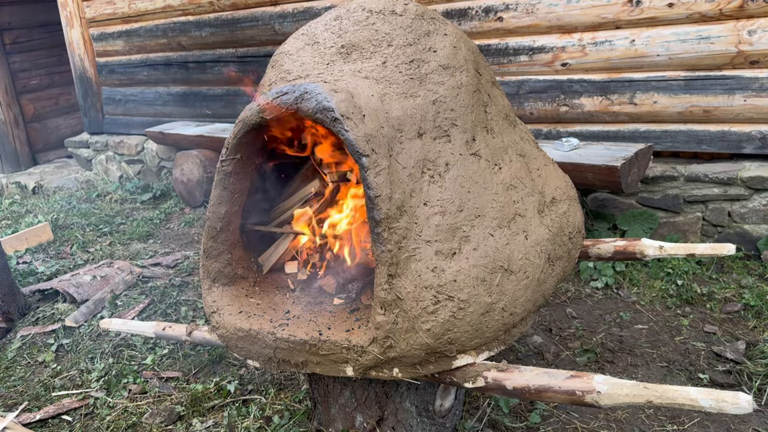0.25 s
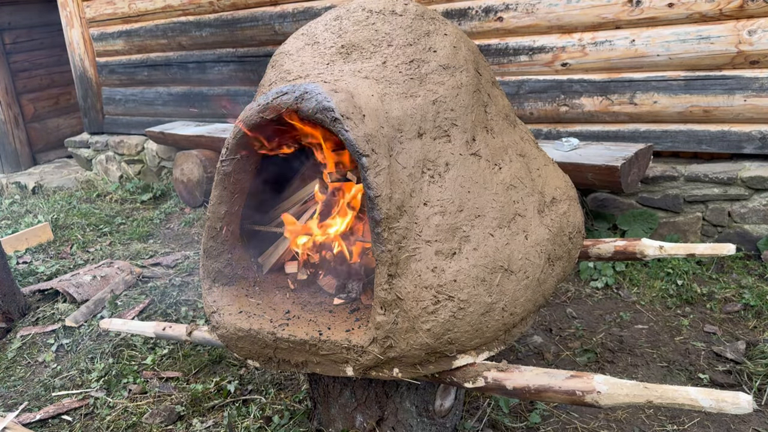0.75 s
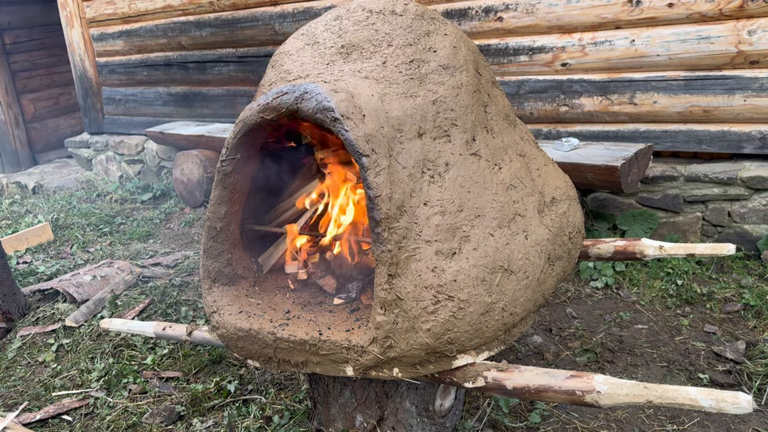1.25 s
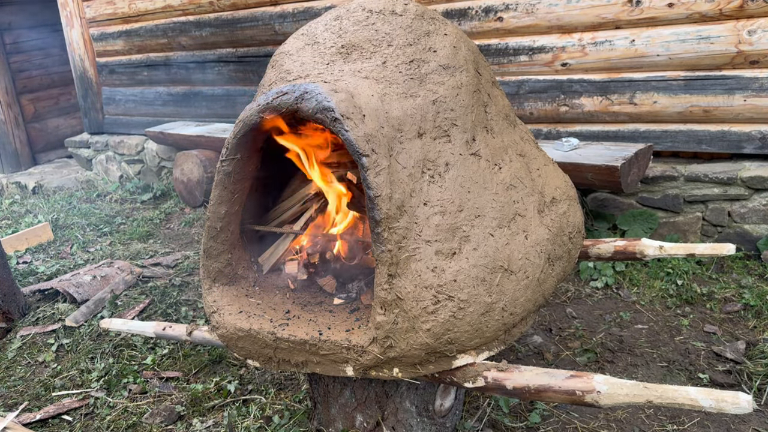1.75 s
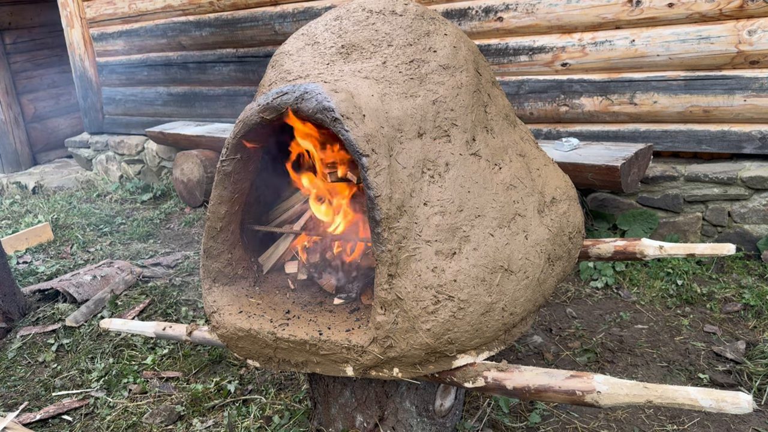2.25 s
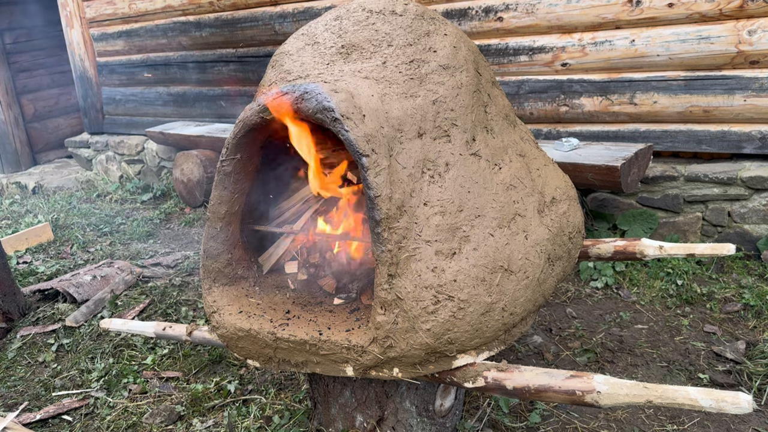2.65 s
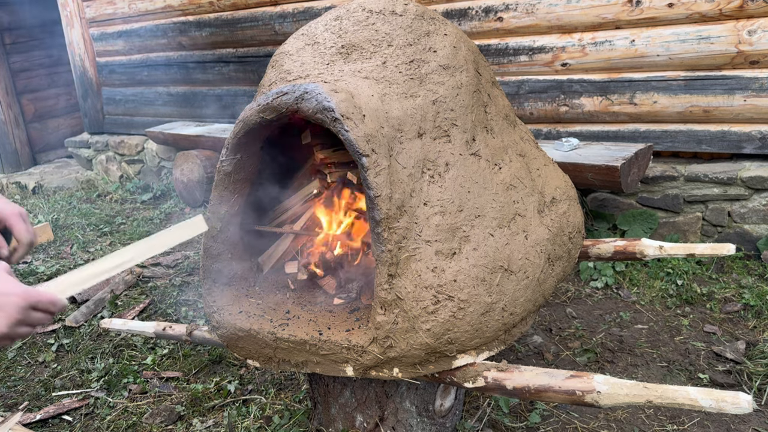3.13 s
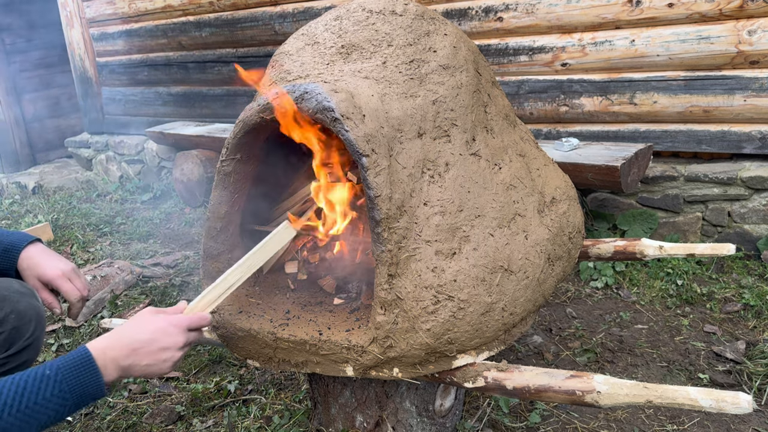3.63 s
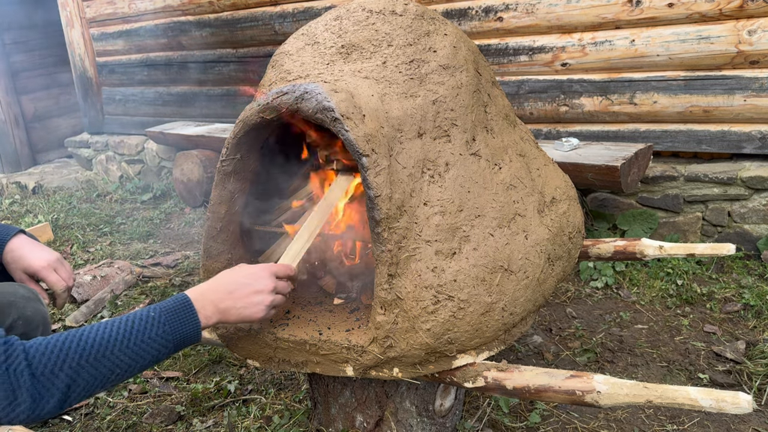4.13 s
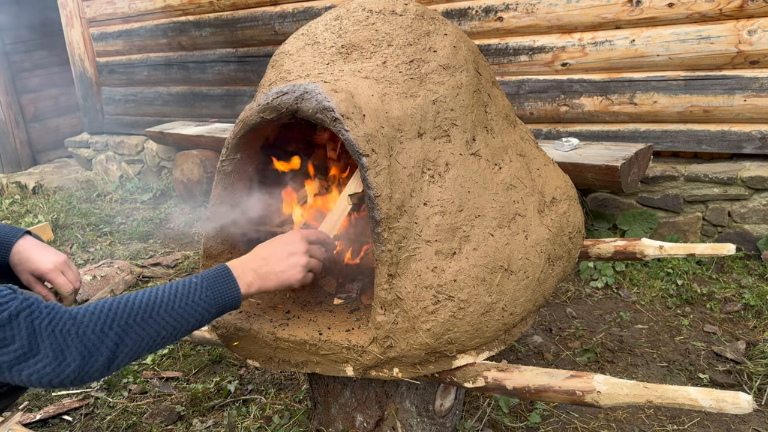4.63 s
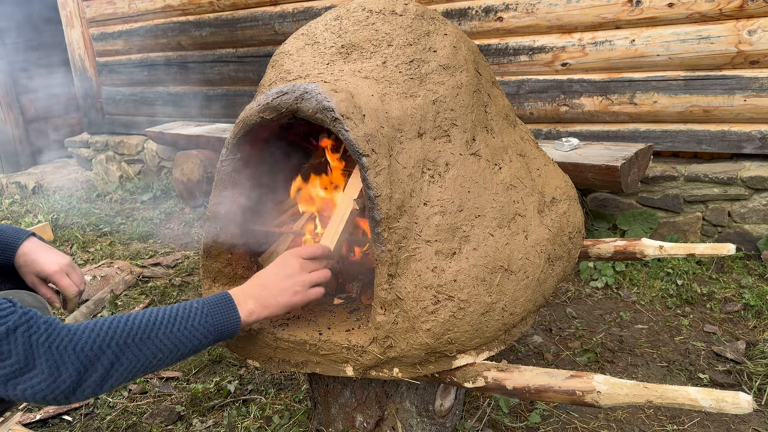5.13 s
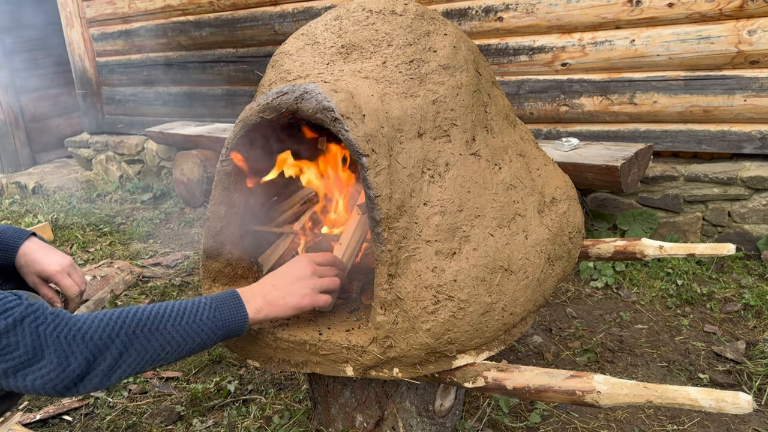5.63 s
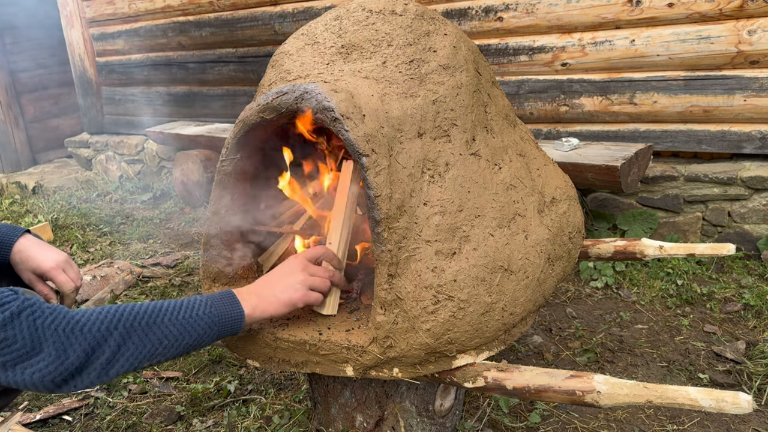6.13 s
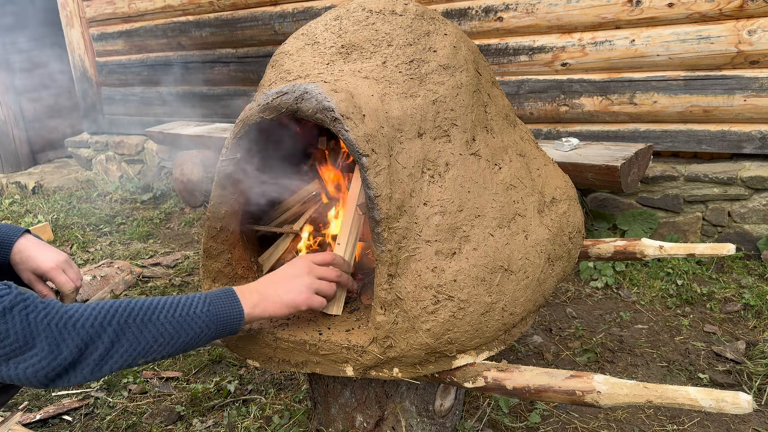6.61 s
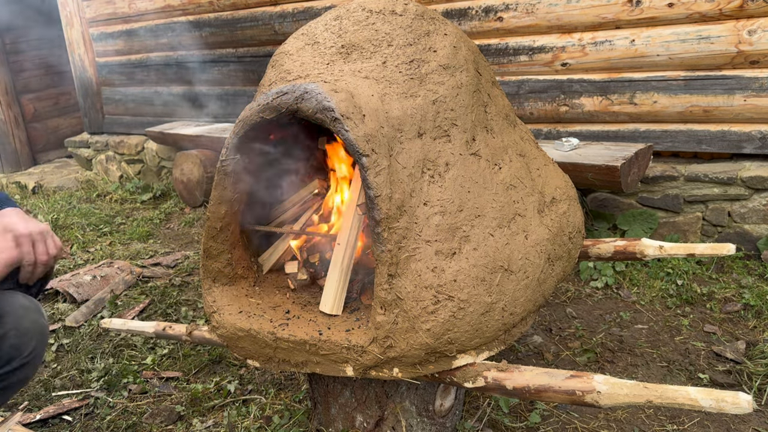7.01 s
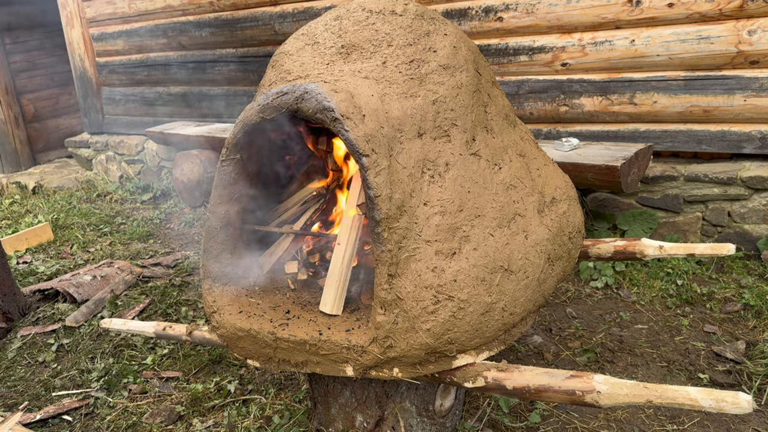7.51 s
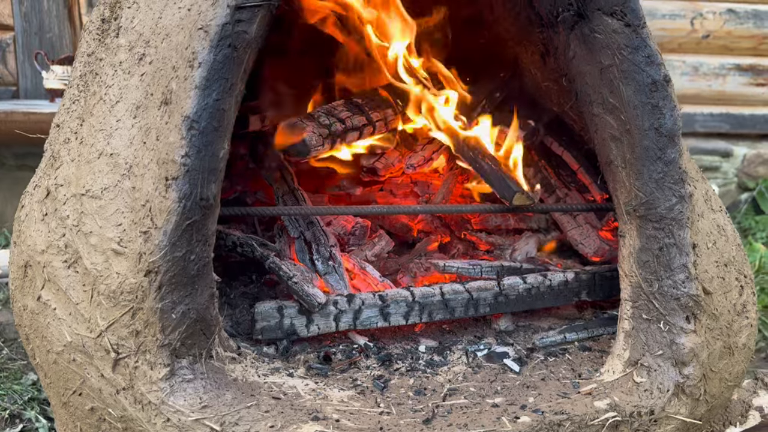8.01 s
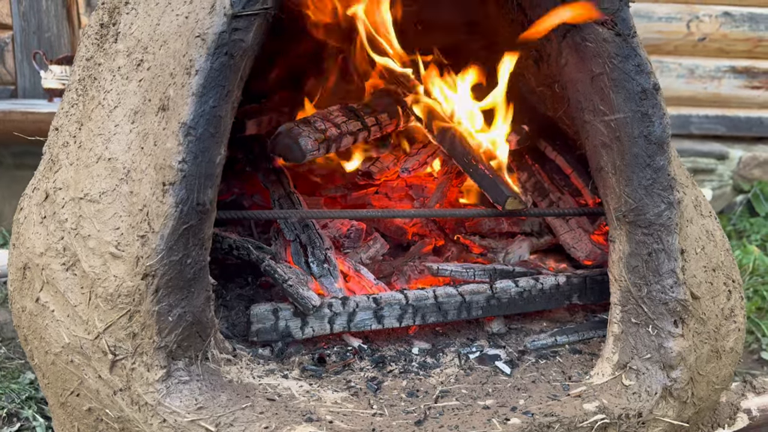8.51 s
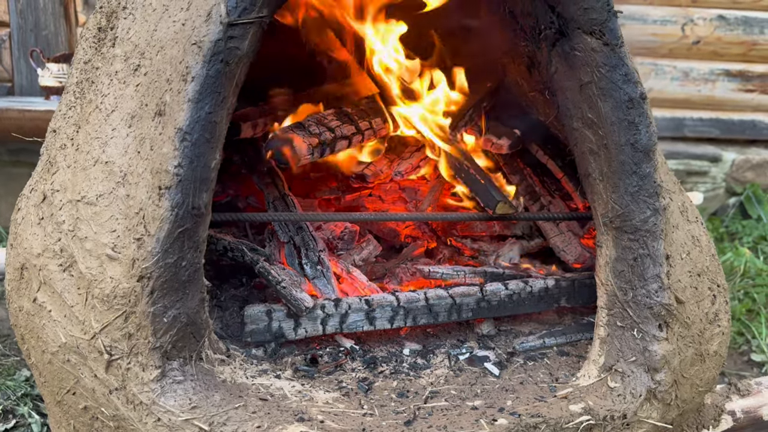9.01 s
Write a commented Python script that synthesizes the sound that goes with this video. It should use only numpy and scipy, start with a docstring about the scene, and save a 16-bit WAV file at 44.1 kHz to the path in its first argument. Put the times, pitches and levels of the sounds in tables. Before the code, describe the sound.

Sharp dry snaps and hollow booming pops of burning kindling over faint sizzle and low flame rumble, wood knocking as a stick is placed.

```python
"""A wood fire in an outdoor clay oven crackles, snaps and pops while a stick of kindling is fed in.
Cracks are bursts of noise shaped like breaking fibres; big pops and one heavy knock also boom.
Filtered noise gives the rumble of the flames, the rush of the draught and the sizzle of sap.
Wood knocks and scrapes in short dull bursts, and a sleeve rustles as swelling noise.
A low thud and a far bird are plain swelling tones."""
import sys
import numpy as np
from scipy import signal
from scipy.fft import rfft, irfft
from scipy.io import wavfile
from scipy.ndimage import uniform_filter1d

SR = 44100
rng = np.random.default_rng(int(sys.argv[2]) if len(sys.argv) > 2 else 0)


def transcribe(signal):
    """Save signal, clipped to [-1, 1], as a 16-bit WAV file at the path in sys.argv[1]."""
    frames = np.atleast_2d(signal).T
    limited = np.clip(frames, -1, 1)
    pcm = np.round(limited * 32767).astype(np.int16)
    wavfile.write(sys.argv[1], SR, pcm)


N = 408366
TIME, FREQS = np.arange(N) / SR, np.fft.rfftfreq(N, 1 / SR)
# the time and frequency scales of one short sound
SHORT_TIME, SHORT_HZ = np.arange(8192) / SR, np.fft.rfftfreq(8192, 1 / SR)


def amp(db):
    """Turns decibels into a gain."""
    return 10 ** (np.asarray(db) / 20)


def unit(x):
    """Scales a signal to rms 1."""
    return x / np.sqrt(np.mean(x ** 2) + 1e-20)


def read(points, hz):
    """Joins points by straight lines over log frequency."""
    f, value = np.transpose(points)
    return np.interp(np.log(hz + 1), np.log(f + 1), value)


def add(mix, s, sound):
    """Mixes a sound in at time s."""
    part = mix[:, max(round(s * SR), 0):][:, :sound.shape[-1]]
    part += sound[..., :part.shape[-1]]


def drift(hz):
    """Random wandering of rms 1, mostly slower than hz."""
    spectrum = rfft(rng.standard_normal(N)) * np.exp(-(FREQS / hz) ** 2)
    return unit(irfft(spectrum, N))


def swell(s, half_length):
    """A smooth rise and fall of height 1 around time s."""
    return np.exp(-((TIME - s) / half_length) ** 2)


def gestures(rows):
    """Gain over time of a few soft movements."""
    return sum(amp(db) * swell(s, half_length) for s, half_length, db in rows)


def levelled(db):
    """The same colour at a mean power gain of 1."""
    return db - 10 * np.log10(np.mean(amp(db) ** 2))


def band_db(hz, centre_hz, octaves, order):
    """A hump around a centre frequency."""
    return -10 * np.log10(1 + abs(np.log2((hz + 1) / centre_hz) / octaves) ** order)


# how alike the two sides of a noise are: f/Hz, likeness [0-1]
LIKENESS = [(60, 0.93), (200, 0.98), (450, 0.17), (1000, 0.018), (3000, 0.24), (7000, 0.052)]


def noise(db):
    """Stereo noise of rms 1 with a given spectrum, most alike on both sides in the bass."""
    a, b = rfft(rng.standard_normal((2, N)))
    same = np.clip(read(LIKENESS, FREQS), 0, 1)
    other = same * a + np.sqrt(1 - same ** 2) * b
    return unit(irfft(np.array([a, other]) * amp(db), N))


# resonances of the oven and the logs: f/Hz, width [Hz], level/dB
OVEN = [(455, 130, 4.5), (613, 34, 7.5), (770, 60, 3), (1235, 45, 7), (1750, 200, 4), (3250, 400, 3)]


def oven_db(hz):
    """The lift that the oven and the logs give at each frequency."""
    f, width, db = np.transpose(OVEN)
    return (db / (1 + (2 * (hz[:, None] - f) / width) ** 2)).sum(1)


def ring(x, db):
    """Colours a short sound so that its resonances ring after the attack, never before it."""
    cepstrum = irfft(np.log(amp(np.maximum(db, -100))))
    fold = 1 + np.sign(np.fft.fftfreq(len(cepstrum)))  # moves all the ringing forward in time
    return irfft(rfft(x) * np.exp(rfft(cepstrum * fold)))


# the second break and the tearing against the first break, and how unevenly the fibres give way
SECOND_BREAK_DB, TEARING_DB, RAGGED_DB = -10, -4, 3
RETURN_S = 0.011  # the scatter grows after this time, as the back wall of the oven returns the crack


def fracture(break_s, decay, tail_db, tail_t60, spread, wall):
    """Two breaks, ragged tearing and scatter off the clay, with the energy of 10 ms at rms 1."""
    t, z = SHORT_TIME, rng.standard_normal((6, len(SHORT_TIME)))
    ragged = amp(RAGGED_DB * unit(uniform_filter1d(z[5], size=60)))
    first = t / break_s * np.exp(1 - t / break_s)
    second = amp(SECOND_BREAK_DB) * np.interp(t - decay * rng.uniform(0.9, 1.95), t, first)
    tearing = ragged * amp(TEARING_DB) * np.exp(-t / max(decay, 2e-4))
    tearing *= 1 - np.exp(-t / break_s / 2)
    returned = 1 + wall / (1 + np.exp(np.clip((RETURN_S - t) / .001, -50, 50)))
    fading = amp(tail_db - 60 * t / tail_t60) * (1 - np.exp(-t / break_s))
    scatter = z[3:5] * ragged * returned * fading
    # one noise for both sides, plus a share of its own for each side
    grain = unit(z[0] + spread * z[1:3])
    burst = grain * (first + second + tearing) + scatter
    return burst / np.linalg.norm(burst, axis=1, keepdims=True) * np.sqrt(SR / 100)


TOP_SPREAD_DB = -3  # how much the top octave differs from one splinter to the next


def splinter_db(db, count=7):
    """Each splinter has a few resonances of its own, and a brighter or duller top."""
    hz = np.exp(rng.uniform(np.log(2200), np.log(15000), (count, 1)))
    lift = db * (1 / (1 + ((SHORT_HZ / hz - 1) / .04) ** 2)).max(0)
    top = TOP_SPREAD_DB * rng.uniform(-1, 1) * np.clip((SHORT_HZ - 9000) / 4000, 0, 1)
    return levelled(lift) + top


def boom(hz, swell_s, steepness):
    """A few cycles of moving air that swell and die."""
    t = np.arange(SR // 3) / SR
    return (t / swell_s * np.exp(1 - t / swell_s)) ** steepness * np.sin(2 * np.pi * hz * t)


# chirps of a far bird: t/s, length [s], top pitch f/Hz, level/dB on the left
CHIRPS = [(5.62, .06, 4380, -51), (8.62, .09, 4330, -57)]


def bird():
    """Short whistles whose pitch and loudness rise and fall in an arch, weaker on the right."""
    out = np.zeros((2, N))
    for s, length, hz, db in CHIRPS:
        arch = np.sin(np.linspace(0, np.pi, int(length * SR)))
        pitch = hz * (1 - 0.043 * (1 - arch))
        whistle = arch * np.sin(2 * np.pi * np.cumsum(pitch) / SR)
        add(out, s, amp(db) * whistle * amp([[0], [-5]]))
    return out


# low buffets of air at the microphone: middle t/s, half length [s], level/dB
BUFFETS = [(6.17, 0.15, -35), (7.07, 0.16, -32.5)]
BUFFET_HZ, BUFFET_OCTAVES = 52, 1


def buffets():
    """Moving air pushes softly at the microphone: low noise that swells and fades."""
    return noise(band_db(FREQS, BUFFET_HZ, BUFFET_OCTAVES, order=8)) * gestures(BUFFETS)


# one heavy, low thud: t/s, level/dB, pitch f/Hz, swell time [s]
THUD = (6.907, -17.5, 56.6, .066)


def thud():
    """A low tone swells steeply and dies within a few cycles."""
    out = np.zeros((2, N))
    s, db, hz, swell_s = THUD
    add(out, s, amp(db) * boom(hz, swell_s, steepness=6.9))
    return out


# strokes of a sleeve as the arm reaches in and draws back: middle t/s, half length [s], level/dB
STROKES = [(6.3, 1, -59), (6.88, 0.15, -55), (7.3, 0.38, -61.5)]
# spectrum of rubbing cloth: f/Hz, relative level/dB per Hz
CLOTH = [(300, -49), (900, 4.5), (1550, 10.5), (2200, -0.5), (5000, -30), (16000, -33)]
CLOTH_GRAIN_DB, CLOTH_GRAIN_HZ = 4, 70  # depth and speed of the roughness


def sleeve():
    """Cloth rustles: grainy noise that swells with each stroke of the arm."""
    grain = amp(CLOTH_GRAIN_DB * drift(CLOTH_GRAIN_HZ))
    return noise(read(CLOTH, FREQS)) * gestures(STROKES) * grain


POP_BREAK_S = 0.00043  # time to the peak of the first break, for contacts and big pops


def contact(hz, decay):
    """A dull burst around one pitch, as of wood on wood or clay, coloured by the oven."""
    colour = levelled(band_db(SHORT_HZ, hz, 0.45, order=4) + oven_db(SHORT_HZ))
    burst = fracture(POP_BREAK_S, decay, tail_db=-26.5, tail_t60=0.13, spread=1.0, wall=1)
    return ring(burst, colour)


# scrapes of wood, and one fine sputter at 1.49 s:
# t/s, length [s], level/dB of a small burst, centre f/Hz
SCRAPES = [(1.49, .22, -56, 3000), (2.936, .03, -41.5, 1450), (8.41, .06, -49, 2100), (8.6, 0.19, -55, 800)]
# bursts per second, their scatter in level, their change along a row, the decay time of each
BURSTS_PER_S, BURST_SPREAD_DB, BURST_FADE_DB, BURST_DECAY_S = 200, 5, -6, .0012


def scrapes_and_sputter():
    """Uneven little bursts, each at its own pitch, fade along the way, as when wood sticks and slips."""
    out = np.zeros((2, N))
    for s, length, db, hz in SCRAPES:
        count = max(round(length * BURSTS_PER_S), 2)
        for k, (jitter, octave, size) in enumerate(rng.uniform(-0.84, 1, (count, 3))):
            along = (k + (1 + jitter) / 2) / count
            burst_db = db + BURST_SPREAD_DB * size + BURST_FADE_DB * along
            add(out, s + along * length, amp(burst_db) * contact(hz * 2 ** octave, BURST_DECAY_S))
    return out


# dull knocks of wood, and a low-mid tick at the start:
# t/s, level/dB, centre f/Hz, scale of the bounce times [s]
KNOCKS = [(.032, -38, 900, .002), (1.573, -41, 3100, .002), (2.166, -36.5, 274, 0.02),
          (2.615, -33.5, 330, 0.013), (3.179, -36, 185, .01), (6.348, -40.5, 850, 0.01),
          (6.443, -40.5, 1400, .002), (6.511, -45.5, 1450, 0.002), (6.557, -46, 700, .006),
          (6.62, -36.5, 970, 0.002), (6.731, -38.5, 280, 0.012), (8.073, -46, 800, 0.0045),
          (8.4, -42, 1100, .007), (8.592, -48.5, 1500, .003), (8.688, -42, 620, .008)]
BOUNCE_DB = -7.5  # step in set level from one contact to the next


def knocks():
    """Each knock or tick is three contacts at loose times, at falling set levels."""
    out = np.zeros((2, N))
    for s, db, hz, gap in KNOCKS:
        for k in range(3):
            start = s + k * gap * rng.uniform(0.378, 1)
            add(out, start, amp(db + BOUNCE_DB * k) * contact(hz, gap / 2))
    return out


# a brief hum of the draught: middle t/s, half length [s], pitch f/Hz, level/dB
HUM = (.79, .07, 238, -46)


def hum():
    """The draught briefly finds a note in the mouth of the oven: a narrow band of noise."""
    s, half_length, hz, db = HUM
    return noise(band_db(FREQS, hz, 0.073, order=4)) * amp(db) * swell(s, half_length)


# how hard the fire burns: t/s, level/dB of the rumble, level/dB of the sizzle (before fixed trims)
FIRE = [(0.0, -43, -48), (0.95, -38.5, -55), (1.569, -44, -49), (3.04, -41, -53.5), (6.01, -45.5, -53.5),
        (6.55, -47.5, -51.5), (6.96, -46.5, -51.5), (8.17, -49, -59), (8.49, -47.5, -53),
        (9.26, -49.5, -63)]
# brief swells and one slight dip of sizzle and ticks: middle t/s, half length [s], change [dB]
CHANGES = [(0.391, 0.069, -1), (0.963, 0.049, 9), (1.536, 0.045, 4.5)]


def burning():
    """Levels over time in dB: the rumble, the sizzle, and the brief changes within the sizzle."""
    s, rumble_db, sizzle_db = np.transpose(FIRE)
    change_db = sum(db * swell(middle, half_length) for middle, half_length, db in CHANGES)
    sizzle_db = np.interp(TIME, s, sizzle_db) + change_db
    return np.interp(TIME, s, rumble_db), sizzle_db, change_db


# spectrum of the flames' rumble: f/Hz, relative level/dB per Hz
RUMBLE = [(15, -42), (32, -17), (52, -4.5), (80, -1.5), (105, 2), (130, 0), (165, -11), (220, -20.5),
          (350, -34), (900, -81)]
LUMPS_DB, LUMPS_HZ = 2.5, 16  # depth and speed of the random flutter


def rumble(rumble_db):
    """Flames flutter: low noise whose level is lumpy."""
    lumps = LUMPS_DB * drift(LUMPS_HZ)
    return noise(read(RUMBLE, FREQS)) * amp(rumble_db + 3.5 + lumps)


def puffs(x, db):
    """Turbulence makes each part of the spectrum swell and fade on its own."""
    z = signal.stft(x, nperseg=512)[2]
    field = rng.standard_normal(z.shape[1:])
    field = uniform_filter1d(field, size=5, axis=0)
    patches = unit(uniform_filter1d(field, size=7, axis=1))
    return signal.istft(z * amp(db * patches), nperseg=512)[1][:, :N]


# spectra of the draught and of the boiling sap: f/Hz, relative level/dB per Hz
DRAUGHT = [(100, -9), (260, 3.5), (500, 4), (800, -2), (1600, -4.5), (3000, -13), (6000, -10.5),
           (16000, -48)]
SIZZLE = [(500, -47), (2000, 7), (3500, 5), (6500, 0), (8500, 9.5), (11000, 4.5), (14000, 3), (15500, 3),
          (17000, -22)]
# the draught is at DRAUGHT_DB when the sizzle level is at its usual, and follows a share of its changes
DRAUGHT_DB, DRAUGHT_FOLLOWS, USUAL_SIZZLE_DB = -52.5, 0.48, -55


def draught_and_sizzle(sizzle_db):
    """Rushing air and boiling sap are two noises, broken up by the same turbulence."""
    flutter, fizz = 1.1 * drift(20), 1.5 * drift(60)
    draught_db = DRAUGHT_DB + DRAUGHT_FOLLOWS * (sizzle_db - USUAL_SIZZLE_DB)
    draught = noise(read(DRAUGHT, FREQS) + 0.033 * oven_db(FREQS)) * amp(draught_db + flutter)
    draught = draught * amp([[.6], [-.6]])  # a little stronger on the left
    sizzle = noise(read(SIZZLE, FREQS)) * amp(sizzle_db - 2.5 + fizz)
    return puffs(draught + sizzle, db=1.8)


TICK_BREAK_S = 0.000072  # time to the peak of the first break


def tick(decay):
    """A bubble of sap bursts; the shortest ticks are the brightest."""
    tilt = 4.7 * np.log2(0.0023 / decay) * np.log2(SHORT_HZ / 11000 + 0.019)
    colour = read(SIZZLE, SHORT_HZ) + tilt
    crack = fracture(TICK_BREAK_S, decay, tail_db=-18, tail_t60=.04, spread=.6, wall=.5)
    return ring(crack, levelled(colour + splinter_db(6)))


# the clearest ticks of bursting sap: t/s, level/dB
TICKS = [(.458, -30), (1.59, -42), (1.8165, -35.5), (2.0198, -36.5), (2.4445, -35.5), (3.11, -39.5),
         (4.0627, -36.5), (4.2608, -40), (4.7753, -37), (5.178, -37), (5.7143, -37), (6.0812, -38)]
TICK_DECAY_S = .0012
# tiny ticks: base rate before clustering, scatter in size, level against the sizzle level
TICKS_PER_S, TICK_SPREAD_DB, TICKS_DB = 34, 5.8, .5
CROWDING = 1.9  # dB of tick rate per dB of brief change
# a snap sets off its neighbours: it adds this many times the base rate, dying away with this time
CHAIN_FACTOR, CHAIN_S = 1.2, 0.022


def crackle(sizzle_db, change_db):
    """A few clear ticks among tiny ones that cluster, crowd or thin out briefly and follow each snap."""
    starts = np.bincount([round(row[0] * SR) for row in SNAPS], minlength=N)
    chain = signal.lfilter([CHAIN_FACTOR], [1, -np.exp(-1 / (CHAIN_S * SR))], starts)
    clusters = amp(4 * drift(7) + CROWDING * change_db)
    chance = TICKS_PER_S / SR * (clusters + chain)
    sizes = amp(TICK_SPREAD_DB * np.minimum(rng.exponential(1, N), 2.6))
    sizes = sizes * (rng.random(N) < chance)
    # twelve kinds of tick, from the shortest to the longest
    decays = np.geomspace(.0004, .0025, 12)
    kind = rng.integers(0, len(decays), N)
    tiny = np.zeros((2, N))
    for k, decay in enumerate(decays):
        hits = (sizes * (kind == k))[None]
        tiny += signal.oaconvolve(hits, tick(decay), axes=1)[:, :N]
    out = unit(tiny) * amp(TICKS_DB + sizzle_db)
    for s, db in TICKS:
        add(out, s, amp(db) * tick(TICK_DECAY_S))
    return out


# the clearest snaps of fibres: t/s, treble level/dB before resonances, middle against treble [dB]
SNAPS = [(0.0382, -16, -12.5), (.129, -29, -11.5), (0.227, -19, -17.5), (0.425, -29, -8),
         (0.4446, -20, -15), (0.882, -30.5, -17), (1.102, -26, -9.5), (1.6126, -30.5, -6.5),
         (1.6793, -28.5, -7.5), (1.752, -40, 2.5), (1.9641, -33, -3), (1.9876, -32.5, -10.5),
         (2.0032, -29, -2.5), (2.3168, -30, -3.5), (2.437, -32, -7), (2.5, -29.5, -10), (2.767, -27, -12),
         (2.8379, -25, -7.5), (3.136, -32, -8.5), (3.1744, -26.5, -10.5), (3.214, -31, -6.5),
         (3.3248, -28, -13), (3.3596, -21.5, -10), (3.385, -31.5, -1), (3.6644, -26, -3.5),
         (3.73, -32.5, -4.5), (3.879, -33, -2), (4.105, -30.5, -6), (4.4273, -33.5, -4.5), (5.0416, -38, 4),
         (5.1009, -23.5, -14.5), (5.342, -33, -2), (5.468, -36, 5.5), (5.595, -31.5, -4),
         (5.987, -15.5, -11.5), (6.192, -18.5, -11), (6.9951, -23, -10.5), (7.045, -25.5, -9.5),
         (7.1565, -19, -15), (7.356, -30.5, -7), (7.6624, -15.5, -7.5), (8.0952, -33, -11.5),
         (8.239, -34, -12)]
SNAP_BREAK_S = 0.00031  # time to the peak of the first break


def snaps():
    """Thin fibres break with little bass and a glassy top; the thicker ones tear for longer."""
    out = np.zeros((2, N))
    for s, db, middle_db in SNAPS:
        top_db = -.8 - .17 * middle_db
        colour = [(120, middle_db - 21.0), (450, middle_db - 0.5), (2500, middle_db),
                  (6500, middle_db / 2 - 2.0), (8500, -1.0), (14500, top_db), (17000, top_db - 16)]
        decay = .002 * amp(.4 * (middle_db + 10))
        colour_db = read(colour, SHORT_HZ) + oven_db(SHORT_HZ) + splinter_db(5)
        crack = fracture(SNAP_BREAK_S, decay, tail_db=-13, tail_t60=0.045, spread=1.0, wall=1)
        add(out, s, amp(db) * ring(crack, colour_db))
    return out


POP_PIVOT_HZ = 2180  # pops are tilted above this
# ringing of a piece of wood: level before its pitch weighting, and cycles in which it falls by 60 dB
PIECE_DB, PIECE_CYCLES = 1.5, 20


def piece(hz):
    """One mode of a piece of wood; the higher ones start stronger and die sooner."""
    cycles = hz * SHORT_TIME
    fading = amp(PIECE_DB - 60 * cycles / PIECE_CYCLES)
    return np.sqrt(hz / POP_PIVOT_HZ) * fading * np.sin(2 * np.pi * cycles)


# big pops, and one heavy knock of settling wood at 7.1996 s:
# t/s, level/dB before colouring, body [dB], brightness [dB per octave], decay time [s],
# low mode f/Hz and high mode f/Hz of the piece, boom level/dB, boom f/Hz, boom swell time [s]
POPS = [(2.356, -17, 5, 1, 0.0046, 408, 5500, -30, 110, 0.0076),
        (4.1389, -15.5, -12, 0, 0.003, 1270, 3640, -23.5, 101, 0.0016),
        (4.216, -20, 4.5, 0, 0.0029, 594, 2340, -22, 115, 0.0079),
        (4.356, -17.5, -5, 0.3, 0.0027, 1790, 3140, -16.5, 116, 0.0032),
        (4.5489, -17, -2.5, 0.9, 0.0019, 525, 1810, -16, 121, 0.004),
        (7.1996, -20.5, 12, -11, 0.008, 432, 620, -20.5, 119, 0.0095),
        (9.1115, -24, -2, 4, 0.004, 1180, 1610, -16.5, 108, 0.0068)]
# the spectrum that they all share: f/Hz, relative level/dB per Hz
POP_COLOUR = [(270, -13), (390, 0.5), (1000, -0.5), (2200, 2.5), (6000, 1), (11000, 1), (16000, -7)]
BODY_HZ = 630  # body lifts or lowers all below this, fading out towards POP_PIVOT_HZ
DULLING_DB = 1.5  # treble lost per octave as the burst dies away
BOOM_DELAY_S = 0.01003  # the hollow starts to boom this long after the burst


def pops_and_heavy_knock():
    """A burst dulls as it dies, a piece of wood rings, then the hollow of the oven booms."""
    out = np.zeros((2, N))
    body = read([(BODY_HZ, 1), (POP_PIVOT_HZ, 0)], SHORT_HZ)
    octaves = np.log2(np.maximum(SHORT_HZ / POP_PIVOT_HZ, 1))
    for s, db, body_db, tilt_db, decay, low_hz, high_hz, boom_db, boom_hz, swell_s in POPS:
        colour_db = read(POP_COLOUR, SHORT_HZ) + body_db * body + tilt_db * octaves
        colour_db = colour_db + oven_db(SHORT_HZ) + splinter_db(3.1)
        burst = fracture(POP_BREAK_S, decay, tail_db=-17.5, tail_t60=.085, spread=.6, wall=2.2)
        early = np.exp(-SHORT_TIME / decay)
        bright = ring(burst * early, colour_db)
        dull = ring(burst * (1 - early), colour_db - DULLING_DB * octaves)
        add(out, s, amp(db) * (bright + dull) * amp([[.3], [-.7]]))
        add(out, s + POP_BREAK_S, amp(db) * (piece(low_hz) + piece(high_hz)))
        add(out, s + BOOM_DELAY_S, amp(boom_db) * boom(boom_hz, swell_s, steepness=1.0))
    return out


def scene():
    """The fire and everything around it."""
    rumble_db, sizzle_db, change_db = burning()
    around = bird() + buffets() + thud() + sleeve() + scrapes_and_sputter() + knocks()
    air = hum() + rumble(rumble_db) + draught_and_sizzle(sizzle_db)
    return around + air + crackle(sizzle_db, change_db) + snaps() + pops_and_heavy_knock()


# phase between the two microphone ports: f/Hz, lead of the left [radians]
LEAD = [(0, 0), (1800, 0), (3200, 1.1), (5500, .8), (7000, -.5), (7900, 0), (22050, -28.4)]
NARROW_HZ = 420  # the two sides are drawn together around this frequency
EDGE_HZ = 16500  # upper band limit


def record(dry):
    """Two ports share part of the sound, most of all the treble; then overload and a band limit."""
    left, right = rfft(dry)
    side = (left - right) / 2 * np.exp(-((FREQS - NARROW_HZ) / 300) ** 2) * 0.38
    left, right = left - side, right + side
    shared = np.clip((FREQS - 7200) / 800, 0, .8)
    right = shared * left + (1 - shared) * right
    right = right * np.exp(-1j * np.interp(FREQS, *np.transpose(LEAD)))
    ports = np.clip(irfft(np.array([left, right]), N), -1, 1)
    low_pass = signal.firwin(255, EDGE_HZ, window=("kaiser", 8), fs=SR)
    return signal.oaconvolve(ports, low_pass[None], "same")


dry = scene()
out = record(dry)
transcribe(out)
```